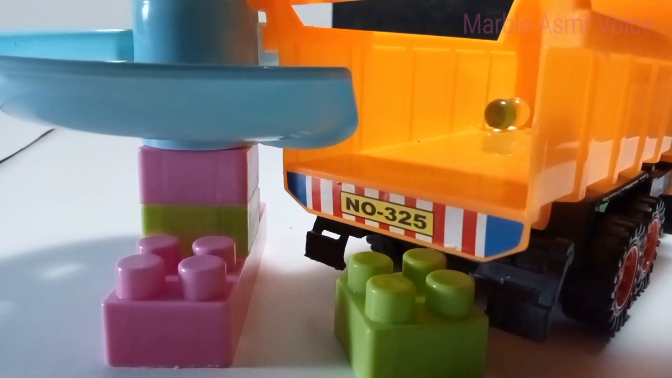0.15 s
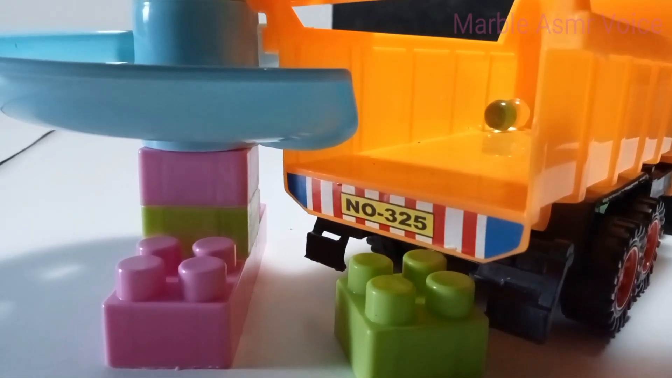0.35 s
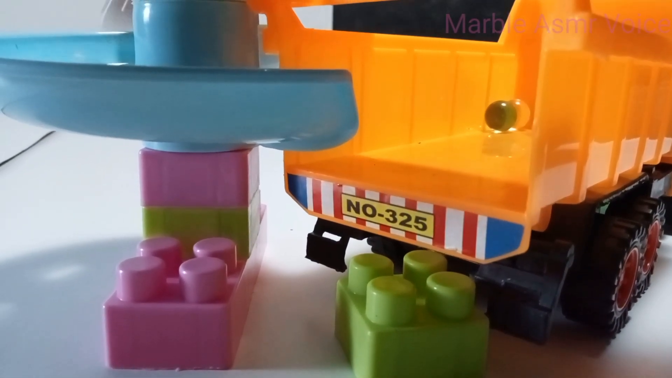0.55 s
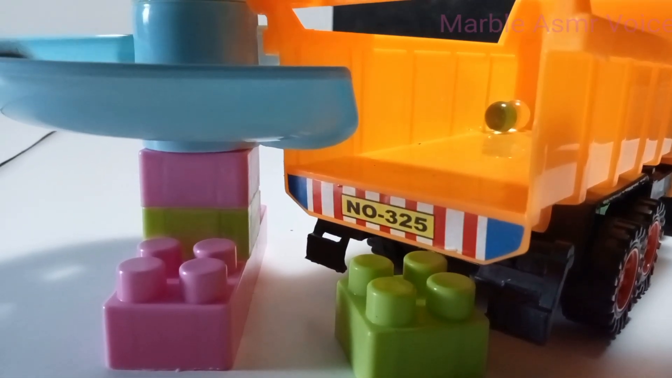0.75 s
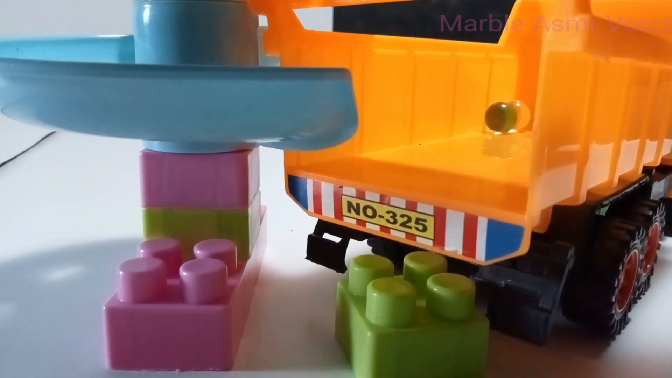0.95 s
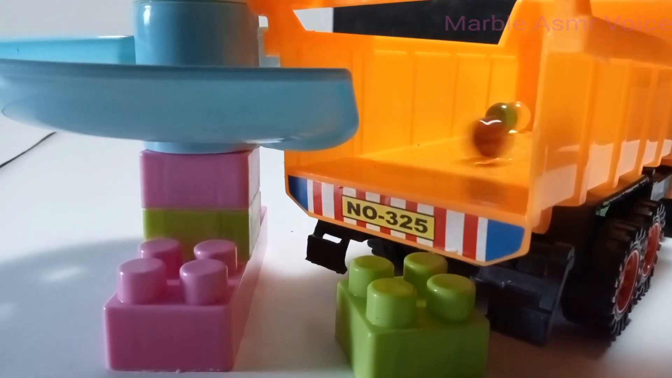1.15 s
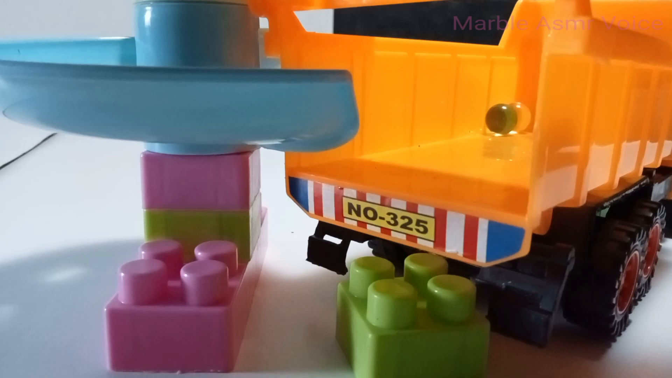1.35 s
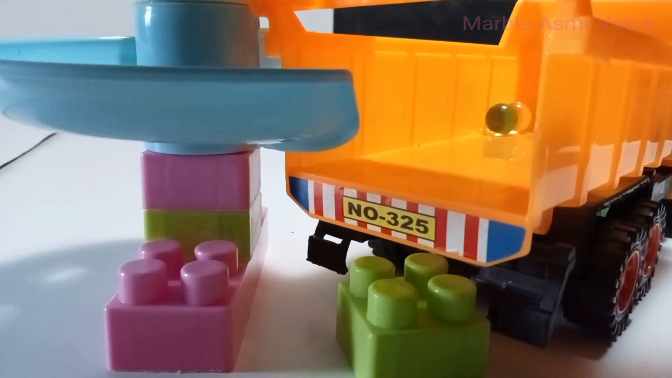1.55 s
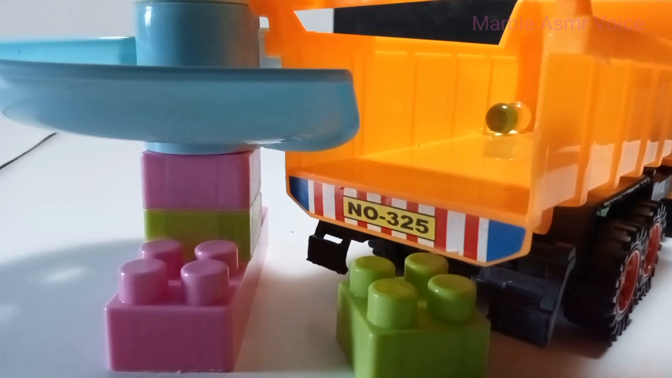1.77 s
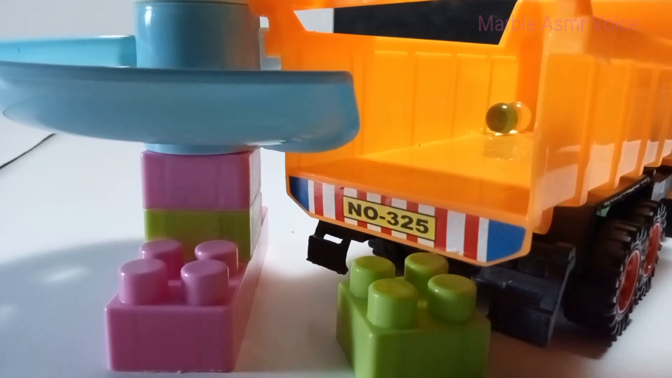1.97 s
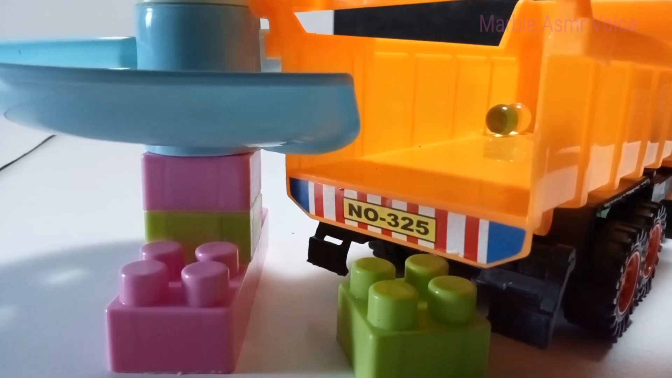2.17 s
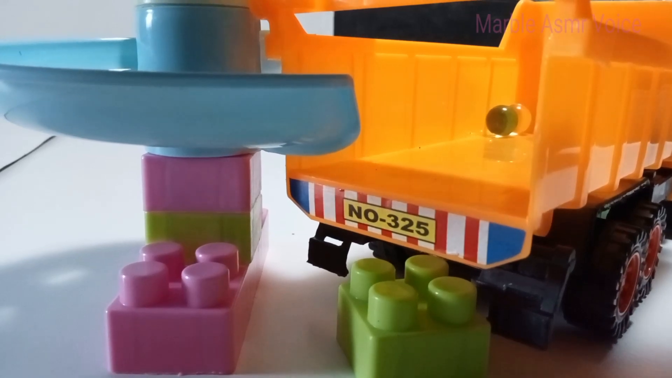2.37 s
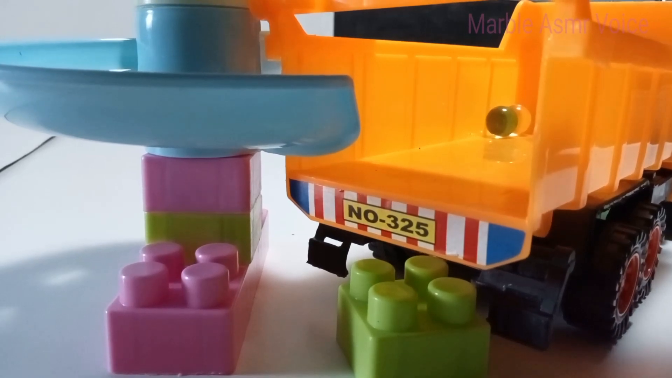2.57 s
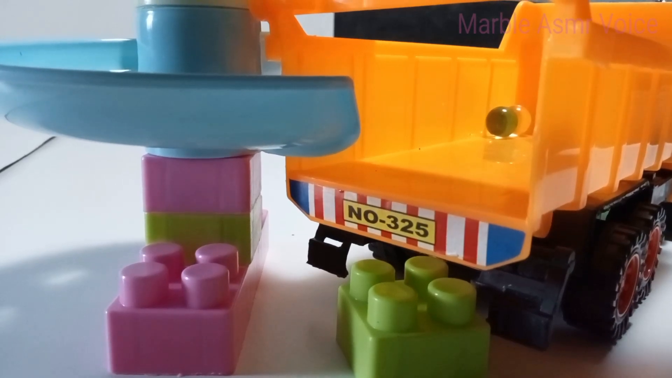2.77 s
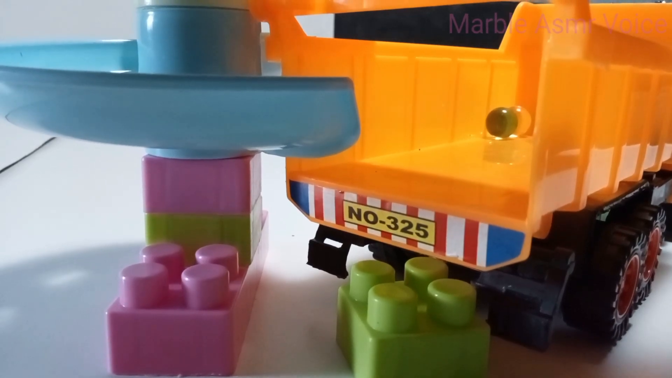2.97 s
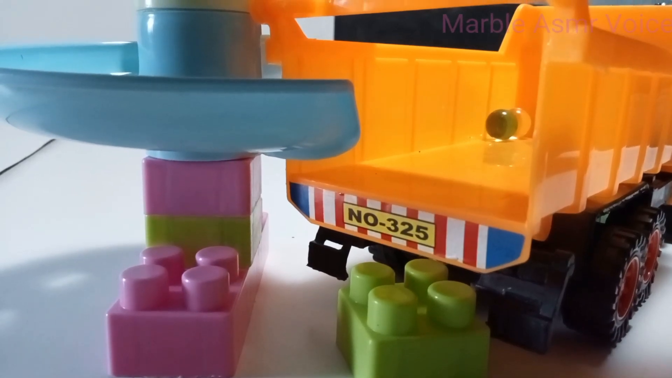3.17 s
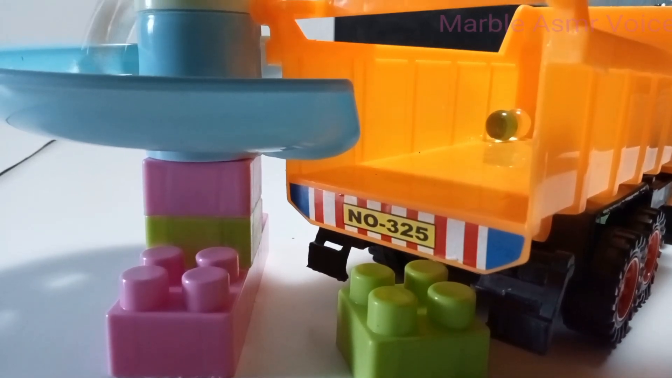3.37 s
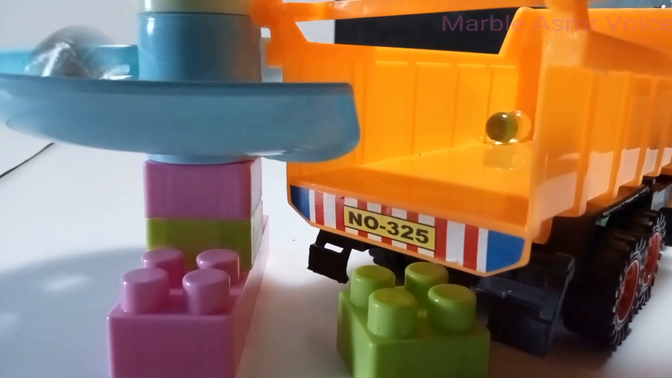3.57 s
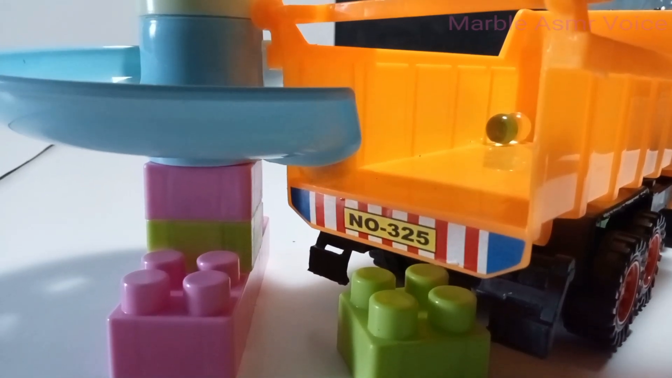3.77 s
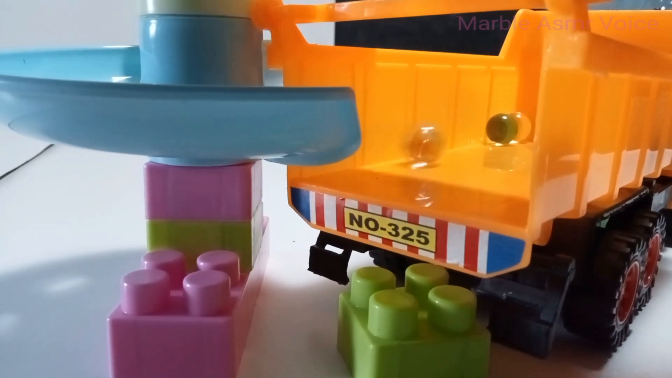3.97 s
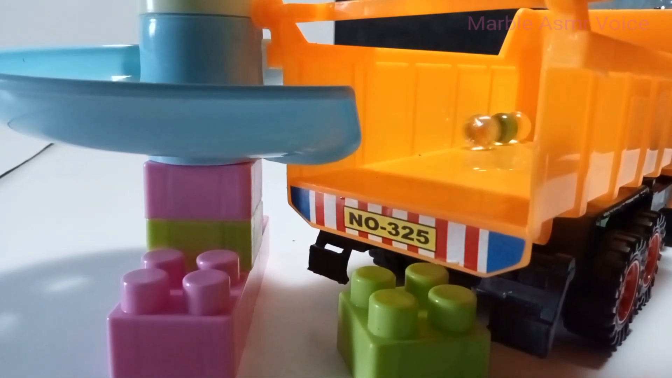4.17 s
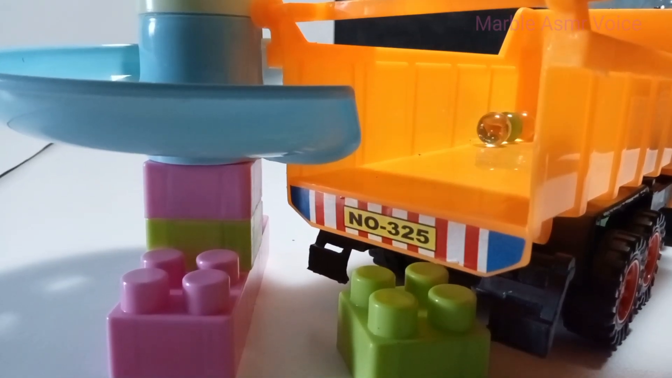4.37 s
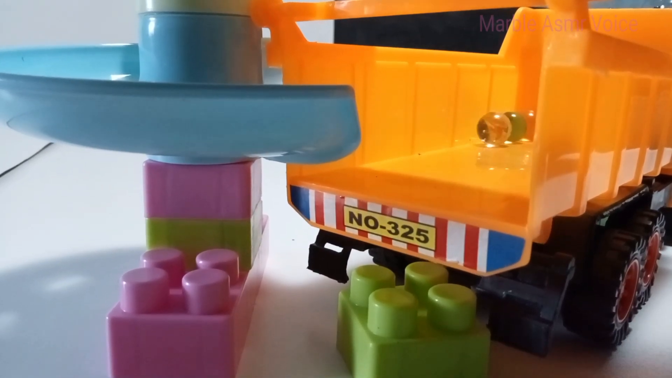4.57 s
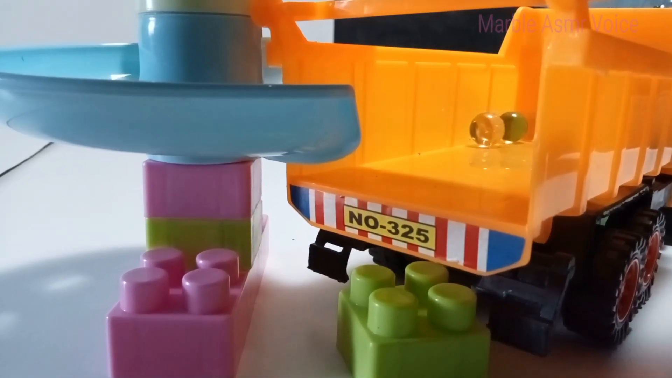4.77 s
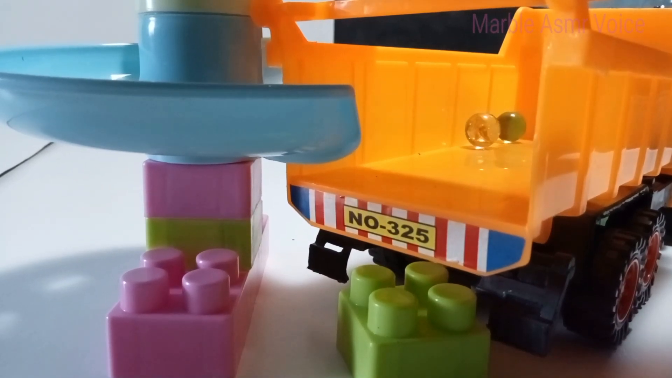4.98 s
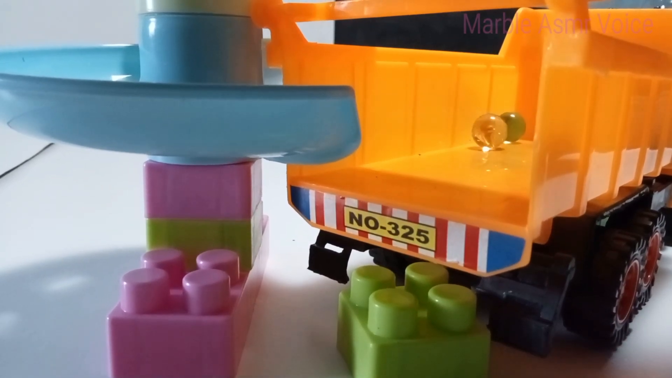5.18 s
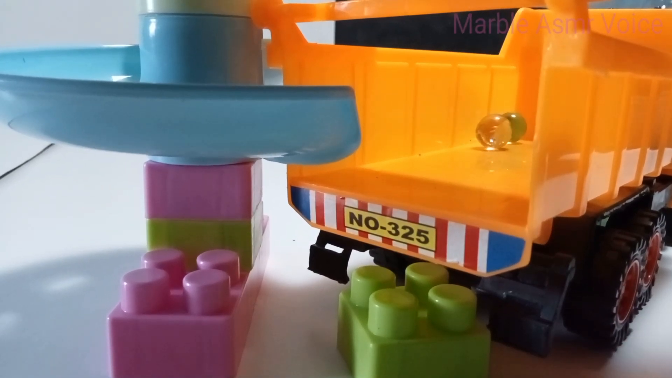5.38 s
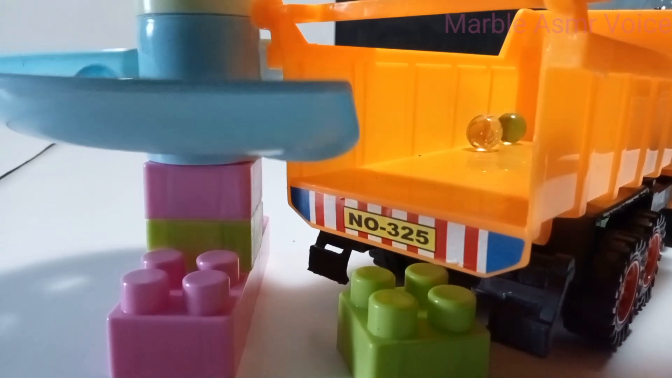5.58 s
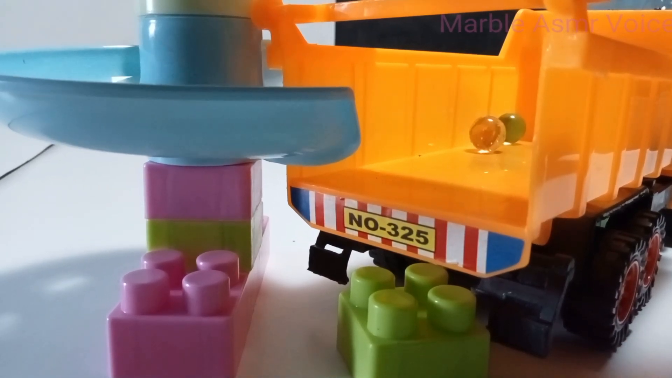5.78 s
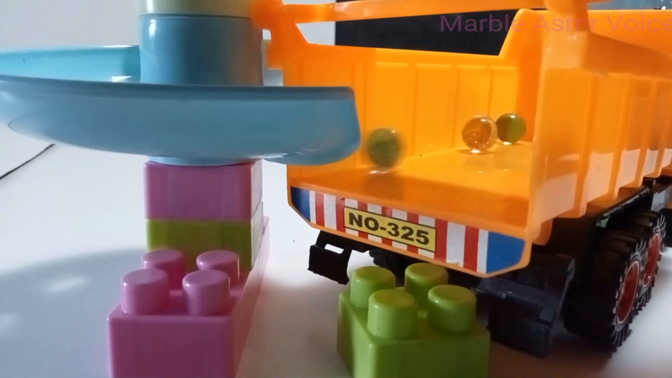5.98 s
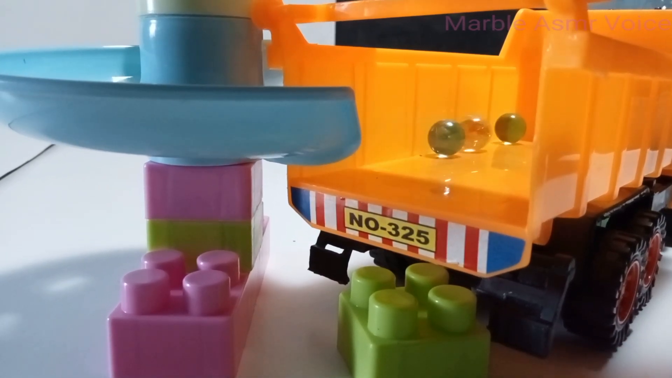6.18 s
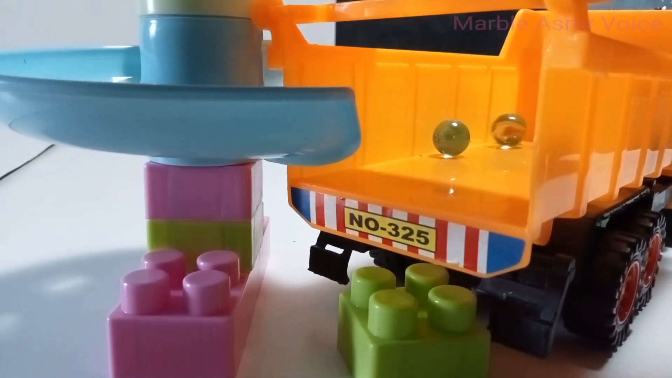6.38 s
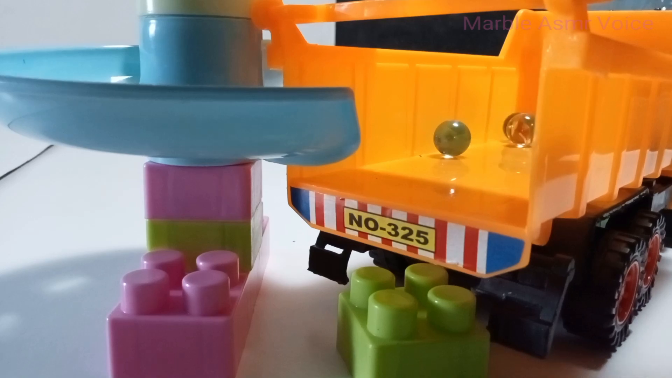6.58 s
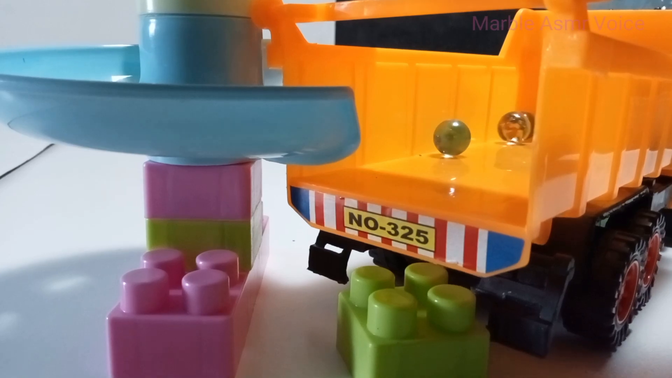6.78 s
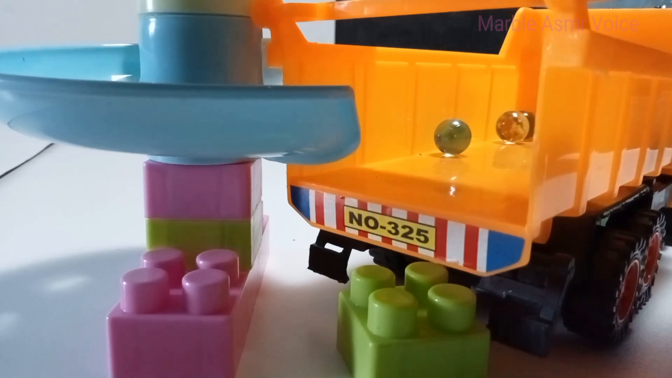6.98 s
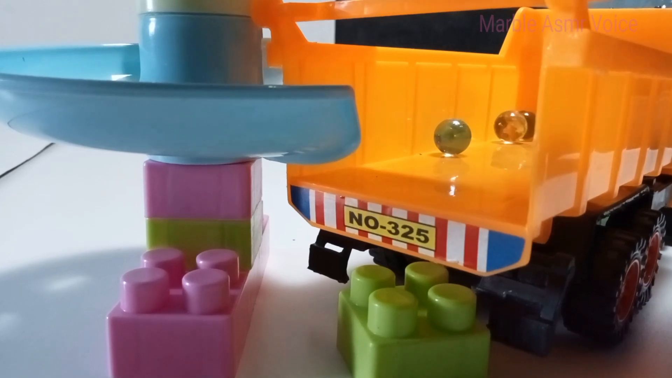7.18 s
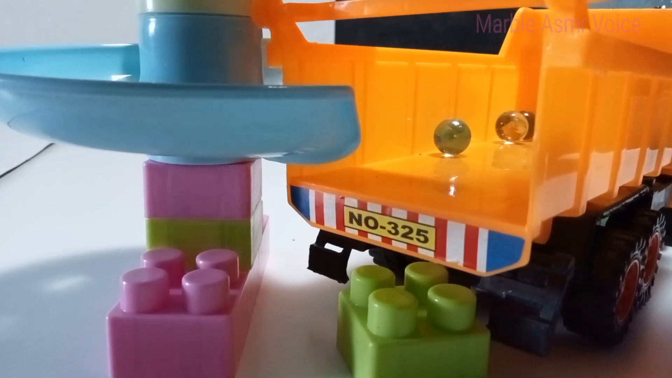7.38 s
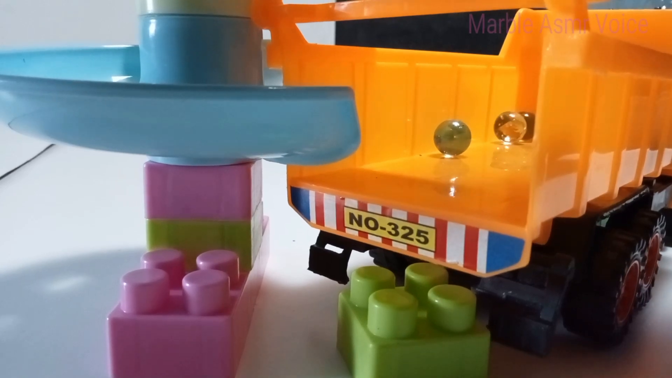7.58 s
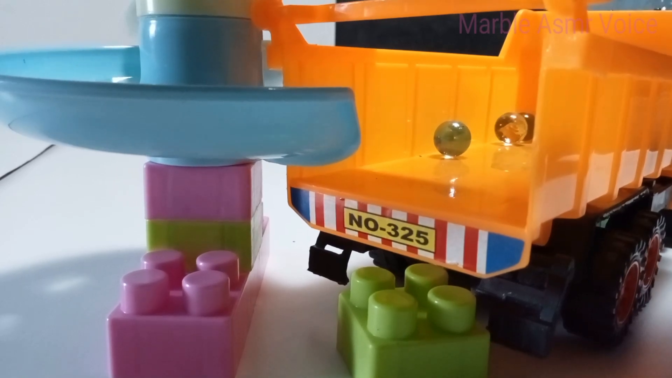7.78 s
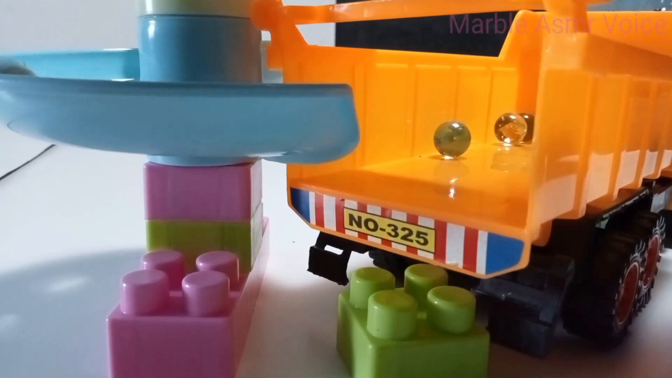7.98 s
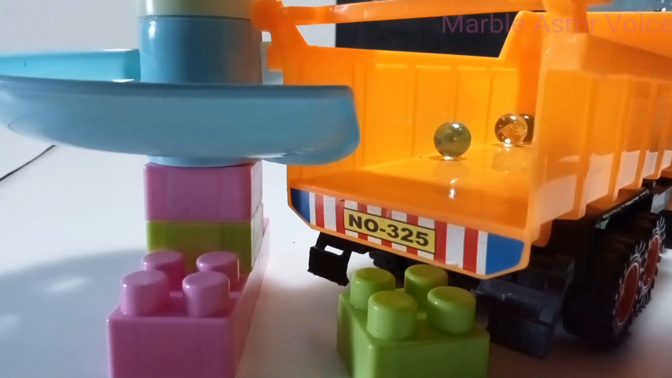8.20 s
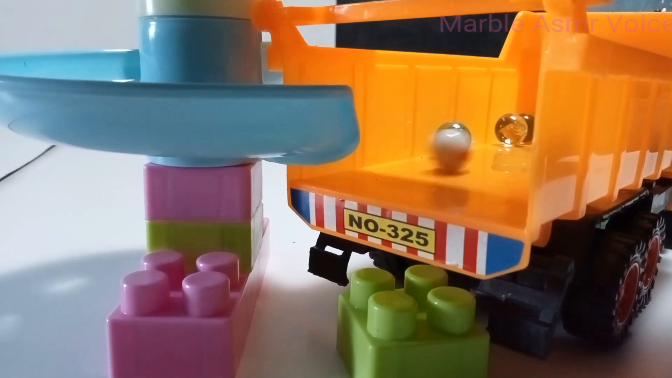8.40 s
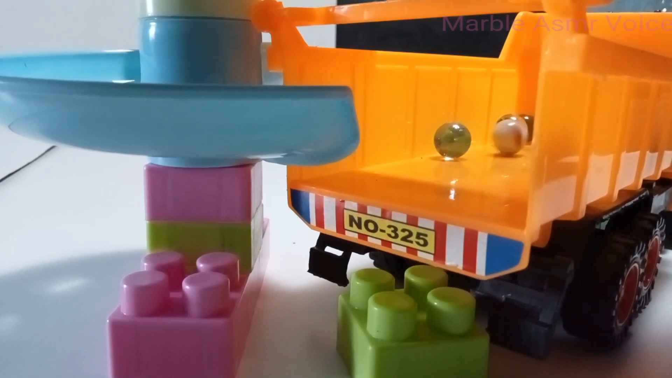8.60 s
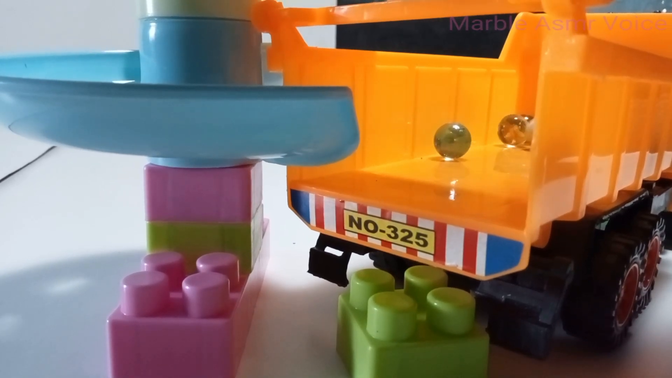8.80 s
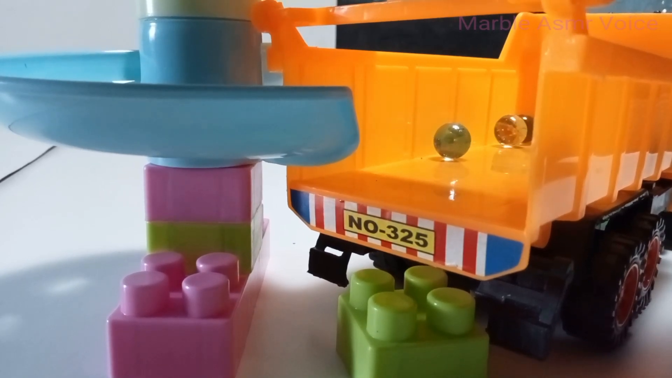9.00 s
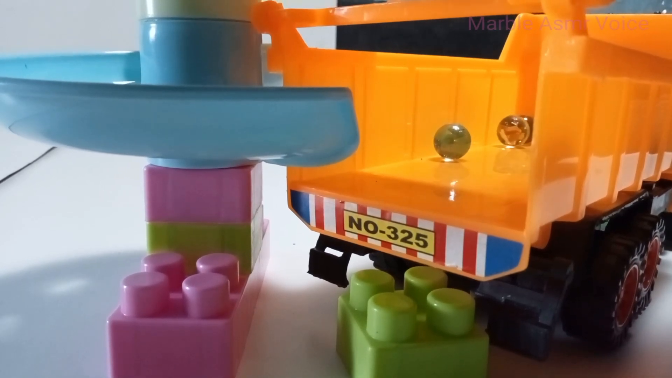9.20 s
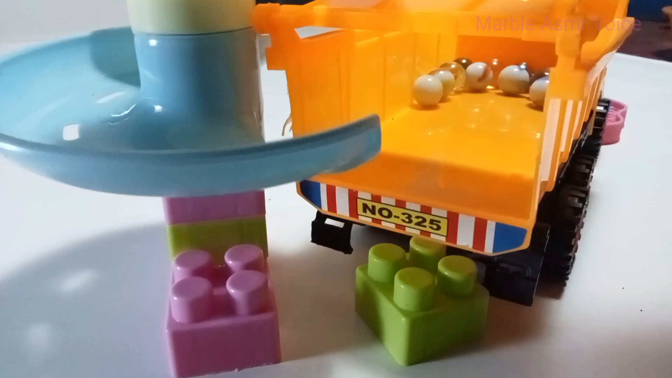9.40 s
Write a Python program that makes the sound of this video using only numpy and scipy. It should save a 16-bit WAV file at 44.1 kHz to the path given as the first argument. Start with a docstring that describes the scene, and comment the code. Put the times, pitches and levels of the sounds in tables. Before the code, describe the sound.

Close view of a plastic marble run in a small bare room. Four times, a glass marble drops onto the last ramp with a sharp bright clack, rattles and rolls for under half a second, then lands in a hollow plastic truck bed with a deeper thud, quick bounces and glassy clicks. Between runs there is faint distant rolling, low room rumble, soft hiss and a thin high whistle.

```python
"""A small bare room, in which glass marbles run down a plastic spiral ramp into the hollow bed of a plastic toy truck.
Contacts excite resonant modes: walls knock, the bed thuds and shakes the table, glass clicks; noise tails are
the room's answer. Rolling is uneven bump noise through the modes of ramp and bed, silent while a ball flies.
Behind it lie shaped-noise rumble and hiss, a wavering mains sine, and narrow noise at a drifting pitch: a thin
pulsing whistle like a far cricket."""
import sys
import numpy as np
from scipy import signal
from scipy.fft import rfft, irfft, next_fast_len
from scipy.io import wavfile

SR = 44100
rng = np.random.default_rng(int(sys.argv[2]) if len(sys.argv) > 2 else 0)


def transcribe(signal):
    """Save signal, clipped to [-1, 1], as a 16-bit WAV file at the path in sys.argv[1]."""
    frames = np.atleast_2d(signal).T
    limited = np.clip(frames, -1, 1)
    pcm = np.round(limited * 32767).astype(np.int16)
    wavfile.write(sys.argv[1], SR, pcm)


N = 416744
T = np.arange(N) / SR

# Contacts of the marbles, nominal levels before the room's answer: t/s, wall knock peak level/dB,
# bed thud level/dB, glass click level/dB, knock f/Hz, thud f/Hz
CONTACTS = [(0.1283, -66, -50, -50, 2690, 466), (0.1436, -47, -46.5, -37, 3440, 716),
            (0.2416, -48.5, -49.5, -65, 3060, 759), (0.6921, -10.5, -19.5, -13, 2270, 1560),
            (0.7102, -18.5, -36.5, -40.5, 2380, 1390), (0.8139, -33, -53, -36, 3840, 495),
            (0.834, -31, -43.5, -43, 2280, 1540), (0.937, -34, -37, -43, 1980, 1550),
            (1.054, -37.5, -47.5, -64.5, 3060, 1020), (1.158, -13.5, -13.5, -20, 2750, 1110),
            (1.2289, -17.5, -19.5, -22.5, 2860, 1270), (1.27, -39.5, -27, -47, 1850, 1220),
            (1.2977, -23.5, -30, -33, 3050, 1250), (1.4673, -30.5, -34.5, -48.5, 1830, 930),
            (1.514, -16.5, -18.5, -12, 1970, 1170), (1.5226, -34.5, -21.5, -32, 4240, 1055),
            (1.6698, -40.5, -29.5, -41, 4240, 1160), (2.0181, -16.5, -24.5, -13.5, 3470, 780),
            (2.45, -50.5, -54.5, -64, 2770, 549), (2.573, -54, -57.5, -27.5, 4830, 540),
            (2.7284, -39.5, -34, -47, 3320, 1520), (2.7513, -50, -37, -59, 2830, 756),
            (3.0163, -45.5, -44, -53, 3040, 1400), (3.0548, -44.5, -45.5, -56, 2040, 740),
            (3.0999, -52, -55, -68, 3600, 751), (3.2181, -49, -58, -73, 2500, 694),
            (3.4008, -42, -51, -62, 3610, 760), (3.5174, -15.5, -25, -16.5, 2260, 808),
            (3.6214, -29, -43.5, -33.5, 3280, 1580), (3.6636, -20.5, -26.5, -27, 2230, 1630),
            (3.6774, -19, -47, -32, 2270, 1550), (3.6895, -27, -32.5, -27.5, 4230, 740),
            (3.7381, -25.5, -36.5, -42, 4240, 1430), (3.7747, -19, -24, -23.5, 2100, 1490),
            (3.7906, -19, -28.5, -31.5, 2040, 1590), (3.8384, -45, -68, -39, 2050, 690),
            (3.9086, -12.5, -13.5, -17.5, 1880, 927), (3.9434, -25, -27, -41, 2940, 950),
            (4.0087, -28.5, -32, -51, 3060, 930), (4.0629, -35.5, -30.5, -49, 2700, 950),
            (4.1053, -25.5, -34, -56, 1780, 1140), (4.1131, -28, -30, -41, 4410, 950),
            (4.1328, -34, -32, -52, 3050, 1110), (4.2288, -38.5, -34.5, -75, 1820, 912),
            (4.3117, -25.5, -31.5, -17, 4620, 1000), (4.3591, -22.5, -23, -20.5, 1960, 1075),
            (4.3729, -16.5, -25, -15, 3040, 780), (4.4311, -37, -53, -30, 2630, 1220),
            (4.4501, -42.5, -58.5, -32.5, 4550, 1100), (4.9107, -40.5, -44.5, -53, 2230, 540),
            (4.9472, -51, -46.5, -67, 2750, 552), (5.022, -37.5, -34.5, -25, 4160, 1240),
            (5.2141, -44, -64, -64, 3570, 722), (5.5323, -44.5, -51, -58.5, 2160, 1570),
            (5.6189, -21, -31.5, -24, 2260, 780), (5.7696, -9.5, -20.5, -19, 2230, 1550),
            (5.7814, -31.5, -30.5, -24.5, 2230, 1500), (5.8336, -27.5, -49.5, -37, 1860, 1450),
            (5.8725, -28.5, -36, -40, 2080, 1450), (5.912, -36, -47, -44, 2820, 1580),
            (6.0041, -13, -14.5, -14, 1890, 980), (6.0406, -22.5, -27.5, -50, 3720, 950),
            (6.1074, -31, -31.5, -46, 2850, 1030), (6.1315, -31, -26.5, -42.5, 4560, 1180),
            (6.2038, -44.5, -33, -57, 1970, 918), (6.2369, -48, -30, -55, 1840, 960),
            (6.2786, -28, -32, -13, 4630, 1050), (6.5016, -40.5, -61.5, -27.5, 4640, 490),
            (6.6016, -70, -54, -74.5, 4230, 1024), (6.701, -13, -22, -14.5, 2020, 823),
            (6.831, -29, -31, -25, 1950, 1160), (6.996, -47.5, -37, -57, 1800, 1170),
            (7.0643, -51, -46, -68, 2670, 565), (7.1798, -51, -47, -64, 4010, 566),
            (7.233, -53, -45.5, -69, 2330, 574), (7.7905, -46.5, -54.5, -65.5, 3060, 727),
            (7.846, -55, -55, -57, 2030, 1310), (7.9329, -10, -20.5, -13, 2240, 1420),
            (8.1424, -43, -64, -63, 2900, 781), (8.1883, -32, -38, -59, 2130, 1540),
            (8.4099, -14, -14, -15.5, 1880, 1054), (8.4498, -34, -32, -43, 2290, 980),
            (8.4849, -17, -17, -21.5, 4210, 1200), (8.513, -34, -48, -42, 3070, 1180),
            (8.5297, -34, -42, -46, 3600, 1170), (8.6537, -40, -37, -52, 1880, 910),
            (8.6809, -38.5, -29, -60, 1960, 929), (8.8205, -32, -32, -14, 4640, 1450),
            (8.8334, -20, -20.5, -25, 4160, 1010), (8.869, -36.5, -32.5, -24.5, 4570, 1220),
            (9.0347, -30, -25, -24.5, 2860, 960), (9.0585, -31, -30, -32, 1850, 1000),
            (9.1616, -59, -45, -40.5, 3050, 614), (9.2339, -54, -52, -54, 2140, 622)]
# Rolling, one curve per marble: t/s, drone level of the hollow plastic/dB, rattle level of the thin walls/dB
ROLLS = [
    [(0.0, -49, -89), (0.094, -53, -62), (0.23, -64.5, -77), (0.49, -61.5, -76.5), (0.746, -63.5, -69.5),
     (0.862, -51, -50), (1.016, -53, -61.5), (1.178, -53.5, -62), (1.332, -41.5, -59.5),
     (1.458, -44.5, -48.5), (1.548, -47.5, -58), (1.694, -64.5, -81), (1.8, -89, -89)],
    [(2.4, -67, -72), (2.66, -59.5, -73), (2.82, -69, -84), (3.01, -74, -80), (3.46, -55, -65),
     (3.57, -36, -65), (3.69, -50.5, -50.5), (3.82, -42, -47), (4.12, -46, -59.5), (4.26, -42.5, -61.5),
     (4.34, -44.5, -51.5), (4.46, -62, -70), (4.56, -64, -75)],
    [(4.6, -60, -82), (4.762, -58.5, -89), (4.942, -60.5, -86), (5.098, -54, -60.5), (5.272, -61.5, -82),
     (5.528, -65.5, -60), (5.626, -38.5, -60), (5.778, -50, -49.5), (5.936, -53.5, -53),
     (6.054, -42.5, -65), (6.168, -46.5, -60), (6.304, -55, -60.5), (6.55, -69, -74)],
    [(6.75, -63, -73), (6.91, -66, -80), (7.23, -55, -87), (7.49, -61.5, -79), (7.79, -62.5, -69),
     (7.98, -47, -37), (8.1, -49, -53), (8.4, -51, -69), (8.56, -43, -51), (8.72, -39.5, -52),
     (8.89, -61, -56), (9.0, -90, -80), (9.2, -81, -82)],
]
# Stages of each marble: drop onto the last spiral t/s, departure from its end t/s, landing in the bed t/s
STAGES = [(0.694, 1.131, 1.158), (3.516, 3.883, 3.909), (5.62, 5.981, 6.003), (7.932, 8.374, 8.41)]
# Modes of the hollow truck bed: f/Hz, width/Hz, relative level/dB
BED_MODES = [(312, 33, -9.5), (523, 93, -1.5), (730, 69, -1), (901.5, 130, -4.5), (997, 120, -3.5),
             (1170, 169, -6), (1535, 140, -9)]
# Modes of the thin plastic walls: f/Hz, width/Hz, relative level/dB
WALL_MODES = [(1520, 200, 2.5), (1990, 180, -1.5), (2255, 94, -4), (2530, 150, -7), (2790, 160, -2.5),
              (3066, 190, -2.5), (3480, 520, -4), (4220, 160, -2), (4566, 120, -2.5), (5900, 2900, -14),
              (13600, 3500, -24)]
# Modes of the glass click: f/Hz, width/Hz, relative level/dB
GLASS_MODES = [(4800, 990, -11.5), (6350, 280, -5.5), (6950, 660, -7), (8190, 640, -2.5), (8310, 530, -0.5),
               (9340, 870, -1), (11800, 3400, -17), (14400, 1600, -14.5)]
# Modes of the ramp's track: f/Hz, width/Hz, relative level/dB
TRACK_MODES = [(460, 87, -5), (558.4, 81, 0), (716, 120, 7), (905, 120, -9.5), (1090, 150, -7),
               (1380, 140, -10)]
# Whistle, level before its swells: t/s, f/Hz, level/dB
WHISTLE = [(0, 8360, -75.5), (1.5, 8760, -69.5), (1.9, 8300, -68.5), (2.8, 8410, -65.5), (3.5, 8540, -68.5),
           (5, 8550, -69.5), (9.45, 8510, -63.5)]
# Spectrum of the room's rumble and hiss: f/Hz, relative level per Hz/dB
AIR_SPECTRUM = [(25, -38.5), (60, -8), (120, -5), (210, 3), (360, -6.5), (480, -2.5), (660, -15),
                (1550, -15.5), (1870, -30), (2490, -16.5), (6200, -29.5), (9000, -23.5), (10700, -39),
                (15500, -49)]
# Overall tone, with a steep loss of treble above 15 kHz: f/Hz, gain/dB
TOP_RESPONSE = [(60, 2), (14800, -5), (15500, -11), (15900, -41), (16900, -32.5)]

# Blows: strength of each mode varies; loss per octave from the struck pitch on the ramp and in the bed
SCATTER_DB, THUD_FALLOFF_DB = 2, (11, 19)
RAMP_RINGS_DB = 4  # two wall modes ring on in the room's answer to a blow on the ramp
# Room's answer to the loudest blow; rise per dB of a softer (farther) blow; change for a quick rebound
ROOM_DB, ROOM_GROWS_DB_PER_DB = -8.5, 0.075
REBOUND_S, REBOUND_DB = 0.019, -2.5
# Rolling: tiny skips of the ball over the steady bumps
TICKS_PER_S, TICK_DB, TICK_SPREAD_DB = 82, 2, 3.5
GRIT_DB = -7, -11, -11  # grit under the glass, over the rattle: high on the ramp, last spiral, bed
BED_DRONE_HZ, BED_FALLOFF_DB = 980, 9  # loss per octave round the bed's drone
SPIRAL_SINGS_DB = -5.5  # the track's top mode on the last spiral, over the drone
FALL_S, LIFT_S = 0.055, 0.045  # free fall onto the last spiral; fade of the rolling as the ball lifts off
# Background
WHISTLE_SWELLS_DB = 2.5
AIR_DB, AIR_DRIFTS_DB = -62, 1.4
MAINS_HZ, HUM_DB, HUM_WAVERS_DB = 50, -74.5, 6.5
TOP_HZ = 17100  # highest frequency kept


def contacts():
    """Impulsive excitation: walls knock, the hollow bed thuds and shakes the table under it, glass clicks."""
    s, knock_db, thud_db, click_db, knock_hz, thud_hz = np.transpose(CONTACTS)
    anywhere = np.ones(len(CONTACTS))  # no falloff: no mode is favoured
    loudest_db = np.max([knock_db, thud_db, click_db], axis=0)
    rebound = np.diff(s, prepend=-1) < REBOUND_S
    wet_db = ROOM_DB + ROOM_GROWS_DB_PER_DB * (loudest_db.max() - loudest_db) + REBOUND_DB * rebound

    wall = body(WALL_MODES, 1600, SCATTER_DB, knock_hz, 5.4)
    rings = body(WALL_MODES[2:4], 1800, SCATTER_DB, anywhere)
    on_ramp = (1 - in_bed(s))[:, None]
    wall_lingers = lambda f: wall(f) + amp(RAMP_RINGS_DB) * on_ramp * rings(f)
    # a knock's mean level lies well under its peak
    knock = blows(wall, wall_lingers, knock_db - 6.5, wet_db, snap=0.64, ring=0.5,
                  chatter_s=0.0086, room_t60=0.25, gap_s=0.011)

    falloff_db = np.array(THUD_FALLOFF_DB)[in_bed(s), None]
    hollow = body(BED_MODES, 390, SCATTER_DB, thud_hz, falloff_db, most_db=16)
    thud = blows(hollow, hollow, thud_db, wet_db + 0.87, snap=0.51, ring=0.067,
                 chatter_s=0.0037, room_t60=0.21, gap_s=0.00051)

    glass = body(GLASS_MODES, 3000, SCATTER_DB, anywhere)
    click = blows(glass, glass, click_db, wet_db - 4.0, snap=0.64, ring=0.15,
                  chatter_s=0.0066, room_t60=0.25, gap_s=0.0025)

    # the rectified thud pushes the table's two modes
    table = filtered(np.abs(thud), body([(95, 14, -20.5), (313, 200, -11.5)], 75))[0]
    return knock + thud + click + table


def blows(colour, lingers, db, wet_db, snap, ring, chatter_s, room_t60, gap_s):
    """Direct and diffuse sound: a snap and a few ms of chatter through the body, then a new room tail each time."""
    s = np.transpose(CONTACTS)[0]
    t = np.arange(int(.27 * SR)) / SR
    noise = rng.standard_normal((len(s), 2, len(t)))
    strike = amp(-20 * (t / chatter_s) ** 1.3) + snap * np.exp(-t / 0.000077)
    direct = filtered(noise[:, 0] * strike, colour)
    # the same energy in every blow: rms 1 over 4.8 ms
    direct /= np.sqrt(np.sum(direct ** 2, 1, keepdims=True) / (0.0048 * SR))
    # the strongest modes outlast the rest; walls and air absorb the top treble
    dulled = lambda f: lingers(f) * np.abs(lingers(f)) ** ring / (1 + (f / 11000) ** 2)
    decay = amp(-60 * t / room_t60) * (1 - np.exp(-(t / gap_s) ** 2))
    tail = unit(filtered(noise[:, 1], dulled)) * decay
    rows = amp(db)[:, None] * (direct + amp(wet_db)[:, None] * tail)
    where = np.round(s * SR).astype(int)[:, None] + np.arange(len(t))
    return np.bincount(where.ravel(), rows.ravel(), N + len(t))[:N]


def rolling():
    """Roughness excitation: uneven bumps and skips drive track, walls and bed; contact ceases in flight."""
    rolls = sum((T >= run[0][0]) & (T < run[-1][0]) for run in ROLLS)
    drone_db, rattle_db = curves([row for run in ROLLS for row in run])
    spiral = sum((T > drops) & (T < leaves) for drops, leaves, _ in STAGES)
    stage = spiral + 2 * in_bed(T)

    # grains and lumpy noise, then tiny skips
    grains = (rng.random(N) < 150 / SR) * amp(2.2 * rng.standard_normal(N))
    lumps = amp(1.6 * wobble(90) + 3.0 * wobble(25)) + 1.1 * unit(decaying(grains, 0.006))
    ticks = (rng.random(N) < TICKS_PER_S / SR) * amp(TICK_DB + TICK_SPREAD_DB * rng.standard_normal(N))
    bumps = unit(lumps * rng.standard_normal(N)) * (1 + decaying(ticks, 0.0012))

    bed = body(BED_MODES, 330, 0, np.array([BED_DRONE_HZ]), BED_FALLOFF_DB, most_db=15)
    bed_drone = unit(filtered(bumps, bed)[0])
    track_drone = wandering(bumps, TRACK_MODES, 310, drift_db=5.0, rate=11)
    singing = spiral * wandering(bumps, TRACK_MODES[-1:], 900, drift_db=7.5, rate=16)
    drone = np.where(in_bed(T), bed_drone, track_drone) + amp(SPIRAL_SINGS_DB) * singing
    rattle = wandering(bumps, WALL_MODES, 870, drift_db=6.0, rate=13)
    grit = unit(filtered(bumps * lumps ** .6, body(GLASS_MODES, 5500))[0])
    sound = amp(drone_db) * drone + amp(rattle_db) * (rattle + amp(GRIT_DB)[stage] * grit)

    falls = [(drops - FALL_S, drops) for drops, _, _ in STAGES]
    leaps = [(leaves, lands) for _, leaves, lands in STAGES]
    flying = sum(np.clip((T - leaves) / LIFT_S + 1, 0, 1) * (T < lands) for leaves, lands in falls + leaps)
    return sound * rolls * (1 - flying)


def wandering(bumps, modes, low_hz, drift_db, rate):
    """Position-dependent modal coupling: as the ball moves on, every mode swells and fades on its own."""
    rings = filtered(bumps, lambda f: np.vstack([body([mode], low_hz)(f) for mode in modes]))
    return unit(sum(amp(drift_db * wobble(rate)) * ring for ring in rings))


def in_bed(s):
    """Change of resonator: 1 from 3 ms before a marble's landing in the bed until its rolling ends, else 0."""
    return sum((s > lands - .003) & (s < run[-1][0]) for (_, _, lands), run in zip(STAGES, ROLLS))


def body(modes, low_hz, spread_db=0, favoured_hz=None, falloff_db=0, most_db=11):
    """Modal superposition: causal resonances, radiating little under low_hz.
    The struck spot favours the modes near one pitch; each blow finds them at slightly new strengths."""
    hz, width, db = np.transpose(modes)[:, :, None]
    db = db.T  # one row per blow, one column per mode
    if favoured_hz is not None:
        octaves = np.abs(np.log2(hz.T / favoured_hz[:, None]))
        db = db - np.minimum(falloff_db * octaves, most_db)
    signs = (-1.) ** np.arange(len(modes))
    gains = amp(db + spread_db * rng.standard_normal(db.shape)) * signs

    def response(f):
        """Sum of second-order resonances with the radiation's low cut."""
        resonances = 1j * f * width / (hz * hz - f * f + 1j * f * width)
        return gains @ resonances * (1j * f / (low_hz + 1j * f)) ** 2
    return response


def whistle():
    """Quadrature modulation: narrow noise round a slowly drifting pitch, swelling unevenly."""
    hz, db = curves(WHISTLE)
    phase = 2 * np.pi * np.cumsum(hz) / SR
    tone = unit(wobble(380) * np.cos(phase) + wobble(380) * np.sin(phase))
    return amp(db + WHISTLE_SWELLS_DB * wobble(40)) * tone


def background():
    """Stationary noise and a sine, each modulated: room rumble and hiss drift a little; the mains hum wavers."""
    air = unit(filtered(rng.standard_normal(N), lambda f: amp(along(AIR_SPECTRUM, f))))
    hum = amp(HUM_DB + HUM_WAVERS_DB * wobble(4.6)) * np.sin(2 * np.pi * MAINS_HZ * T)
    return amp(AIR_DB + AIR_DRIFTS_DB * wobble(8.8)) * air + hum


def amp(db):
    """Level to amplitude: 20 dB per factor of ten."""
    return 10 ** (np.asarray(db) / 20)


def unit(x):
    """Normalisation by mean power: each row at rms 1."""
    return x / np.sqrt(np.mean(x ** 2, axis=-1, keepdims=True) + 1e-30)


def decaying(x, seconds):
    """First-order relaxation: each impulse decays with this time constant."""
    return signal.lfilter([1], [1, -np.exp(-1 / (seconds * SR))], x)


def along(points, hz):
    """Logarithmic frequency scale: interpolate (f/Hz, level/dB) points along it."""
    f, v = np.transpose(points)
    return np.interp(np.log(hz + 1), np.log(f + 1), v)


def curves(rows):
    """Linear interpolation in time: one value per sample for each column after the time."""
    s, *cols = np.transpose(rows)
    return [np.interp(T, s, c) for c in cols]


def wobble(rate):
    """Slow random modulation: straight lines between Gaussian knots, rate knots a second."""
    count = int(N * rate / SR) + 2
    return np.interp(T * rate, np.arange(count), rng.standard_normal(count))


def filtered(x, response):
    """Convolution theorem: the spectrum of x times a complex response of frequency."""
    m = next_fast_len(x.shape[-1] + 4096)  # padded against wrap-round
    return irfft(rfft(x, m) * response(np.fft.rfftfreq(m, 1 / SR)), m)[..., :x.shape[-1]]


def scene():
    """Linear superposition of all the sources, in one channel."""
    return (contacts() + rolling() + whistle() + background())[None]


def record(dry):
    """Low-pass filtering: the treble falls away steeply and nothing sounds above TOP_HZ."""
    return filtered(dry, lambda f: amp(along(TOP_RESPONSE, f)) * (f < TOP_HZ))


dry = scene()
out = record(dry)
transcribe(out)
```